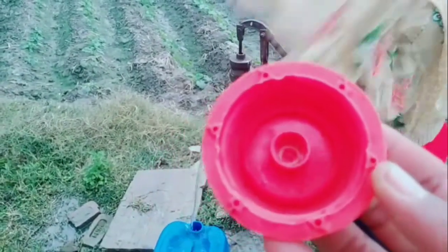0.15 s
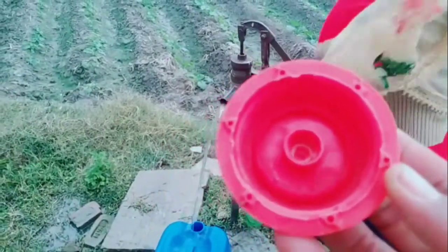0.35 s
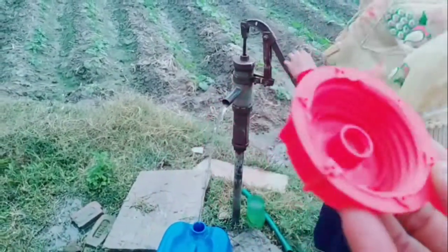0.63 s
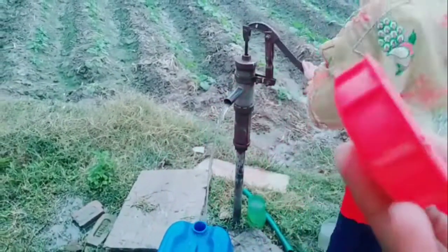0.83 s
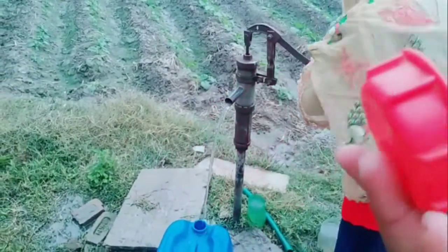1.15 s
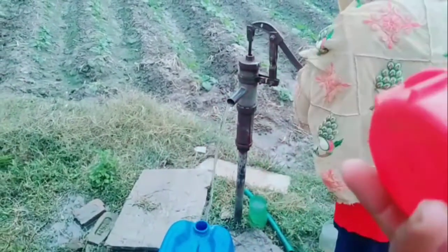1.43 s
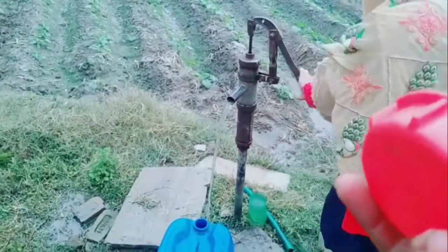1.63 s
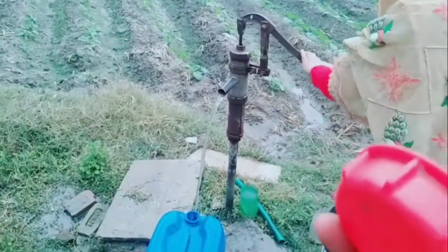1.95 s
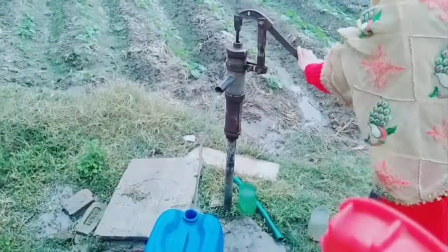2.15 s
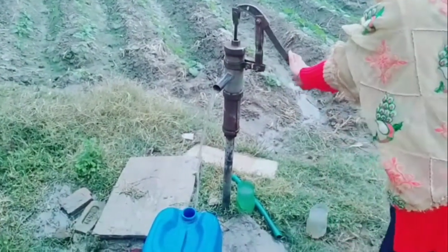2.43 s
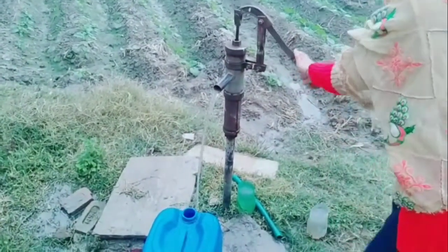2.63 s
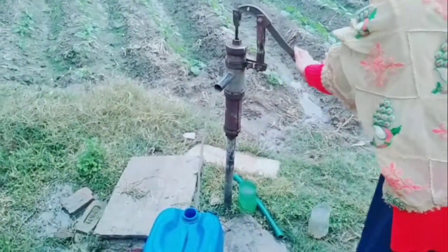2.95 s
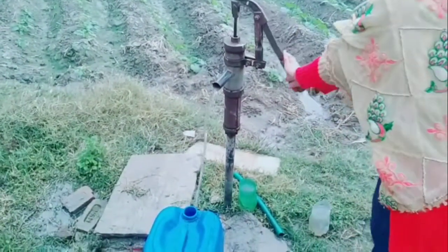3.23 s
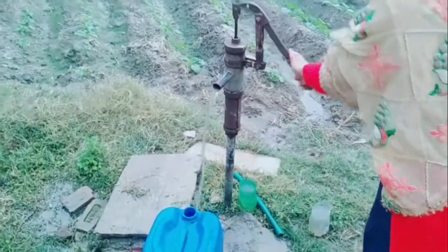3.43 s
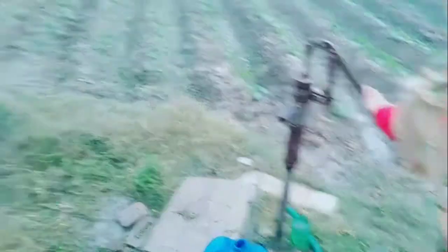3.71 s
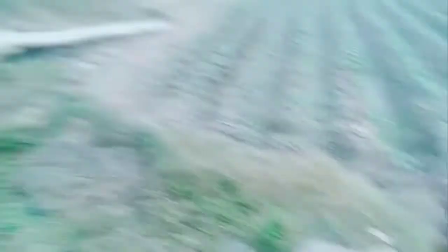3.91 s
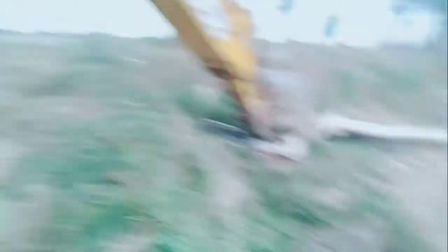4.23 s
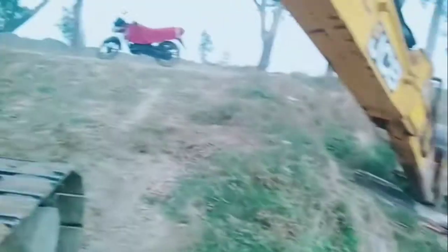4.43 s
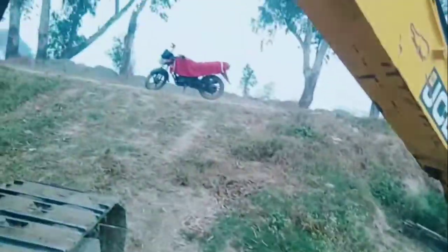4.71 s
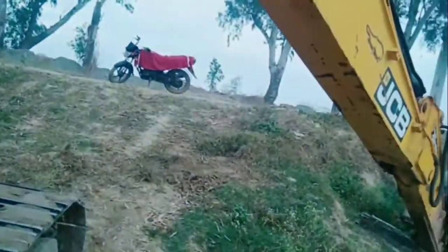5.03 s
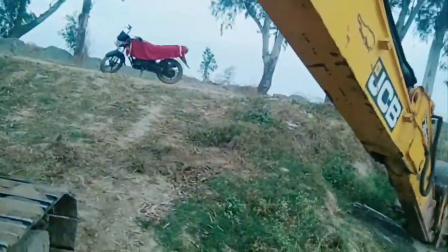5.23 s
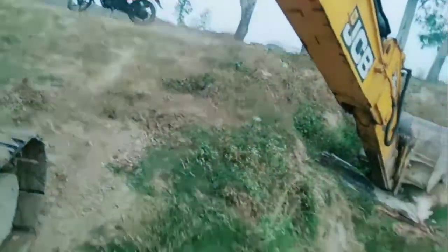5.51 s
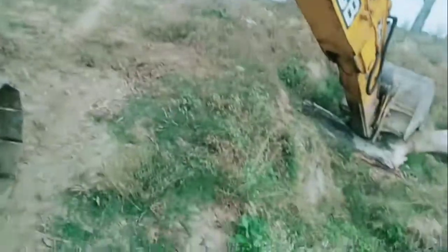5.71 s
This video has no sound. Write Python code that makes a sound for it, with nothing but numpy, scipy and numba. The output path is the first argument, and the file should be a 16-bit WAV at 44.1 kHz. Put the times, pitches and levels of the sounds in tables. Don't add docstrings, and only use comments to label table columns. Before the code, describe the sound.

Close to an open field, water falls from a hand pump in irregular gulps. A busy burst of sharp spatters comes first, then thinner patter with separate slaps, a hollow plastic throb just after two seconds, and sparser splashes to the end. Iron linkage clinks lightly and squeaks once. A phone a few steps away hears it dry and bright, with faint wind rumble and gated, darkened quiet moments.

```python
import sys
import numpy as np
from scipy import signal
from scipy.fft import rfft, irfft, next_fast_len
from scipy.io import wavfile
from scipy.ndimage import uniform_filter1d
from numba import njit

SR = 44100
rng = np.random.default_rng(int(sys.argv[2]) if len(sys.argv) > 2 else 0)


def store_wav(level_fs):
    pcm = np.round(np.clip(np.atleast_2d(level_fs), -1, 1) * 32767)
    wavfile.write(sys.argv[1], SR, pcm.T.astype(np.int16))


def field_ratio(decibels):
    return 10 ** (np.asarray(decibels, dtype=float) / 20)


N = 258867
TIME = np.arange(N) / SR


def unit(x):
    return x / np.sqrt(np.mean(x ** 2))


def colour(x, shape, low_hz, high_hz):
    size = next_fast_len(len(x))
    f = np.maximum(np.fft.rfftfreq(size, 1 / SR), 1)
    hz, db = np.transpose(shape)
    edges = 1 / np.sqrt((1 + (low_hz / f) ** 12) * (1 + (f / high_hz) ** 12))
    gain = field_ratio(np.interp(np.log(f), np.log(hz), db)) * edges
    return unit(irfft(rfft(x, size) * gain, size)[:len(x)])


@njit
def svf(x, hz, width):
    y, b, l = np.empty(len(x)), 0., 0.
    for i in range(len(x)):
        g, k = np.tan(np.pi * hz[i] / SR), width / hz[i]
        v = (b + g * (x[i] - l)) / (1 + g * (g + k))
        b, l, y[i] = 2 * v - b, l + 2 * g * v, k * v
    return y


def band(x, hz, width):
    return unit(svf(x, hz + np.zeros(len(x)), 1. * width))


def walk(rate):
    k = int(SR / rate)
    return uniform_filter1d(np.repeat(rng.standard_normal(N // k + 1), k), k // 2)[:N]


def swell(t, rise, t60):
    return np.clip(t / rise, 0, 1) ** 2 * field_ratio(-60 * np.maximum(t - rise, 0) / t60)


@njit
def grains(start, hz, cycles, size, length):
    y = np.zeros(length)
    for k in range(len(start)):
        steps = int(3 * cycles[k] * SR / hz[k])
        for j in range(min(steps, length - start[k])):
            u = j / steps
            y[start[k] + j] += size[k] * np.exp(-5 * u) * np.sin(2 * np.pi * hz[k] * j * (1 + .06 * u) / SR)
    return y


def droplets(low_hz, high_hz, cycles, scatter_db, count):
    when, pitch, long, size = rng.random((count, 4)).T
    hz = low_hz * (high_hz / low_hz) ** pitch
    size = field_ratio(-scatter_db * np.log(1.01 - size))
    cycles = cycles * (0.38 + 3 * long ** 3)
    return unit(grains((when * N).astype(np.int64), hz, cycles, size, N))


# (frequency [Hz], width [Hz], level [dB])
BODY = [(1168.5, 20.6, 0), (1500, 31, -13), (1810, 49, -15), (2080, 54, -3), (2240, 69, -11), (2610, 24, 5),
        (2740, 120, 0.5), (3053, 63, 2)]


def modes(x):
    return unit(sum((-1) ** k * field_ratio(db) * band(x, hz, w) for k, (hz, w, db) in enumerate(BODY)))


# (frequency [Hz], density [dB per Hz])
WATER = [(410, -69), (700, -12), (1150, -41), (1480, -11.5), (1570, -14), (1670, -25), (1800, -13),
         (2110, -5.5), (2680, -12.5), (3090, -11), (7310, 1), (8300, -1), (10300, -6.5), (13300, -16),
         (14500, -18)]


def water():
    fine = droplets(2510, 12020, cycles=3.8, scatter_db=2.0, count=14000)
    fine = fine + 0.75 * rng.standard_normal(N)
    coarse = droplets(898.0, 3374, cycles=3.15, scatter_db=2.5, count=5000)
    coarse = coarse + 1.14 * rng.standard_normal(N)
    spout = band(coarse, 1304, 93)
    splatter = colour(coarse, WATER, 1023, 4360) + 0.56 * modes(coarse) + 0.24 * spout
    top = colour(rng.standard_normal(N), WATER, 10100, 18000)
    return colour(fine, WATER, 2810, 9270), unit(splatter), top


# (time [s], peak level [dB], brightest frequency [Hz], fade t60 [s])
SPITS = [(0.1605, -26.5, 6470, 0.057), (0.184, -26, 5260, 0.026), (0.2036, -30.5, 6540, 0.16),
         (0.2554, -29, 7400, 0.039), (3.8045, -16, 6100, 0.033), (0.3915, -27, 7500, 0.047),
         (0.4755, -29.5, 2740, 0.095), (0.856, -36.5, 3910, 0.036), (0.8904, -33.5, 6800, 0.072),
         (1.041, -41, 4500, 0.037), (1.0666, -30.5, 6200, 0.037), (1.5851, -40, 7800, 0.025),
         (2.5525, -37, 6040, 0.099), (2.61, -38.5, 4950, 0.036), (2.9193, -29.5, 7160, .03),
         (3.011, -33, 7500, 0.045), (3.031, -28, 6600, 0.039), (3.1314, -30.5, 5900, 0.04),
         (0.1215, -28, 4960, 0.022), (3.252, -34.5, 6900, 0.1), (3.3154, -38, 5040, 0.032),
         (3.5818, -20.5, 5530, 0.033), (3.6742, -33, 4130, 0.021), (3.757, -31.5, 8100, 0.0082),
         (3.8521, -35, 7760, 0.092), (4.4222, -31, 3720, .09), (4.7552, -37.5, 6140, 0.053),
         (5.0305, -37.5, 6240, 0.1), (5.8053, -37.5, 7200, 0.12), (2.121, -44, 6550, 0.084),
         (2.0752, -14.5, 7300, 0.024), (.415, -31.5, 7000, .08)]
# (time [s], peak level [dB], brightest frequency [Hz], fade t60 [s])
SLAPS = [(0.0822, -25.5, 5400, 0.034), (0.131, -22, 6060, 0.067), (0.3015, -33, 2470, 0.054),
         (0.3627, -30, 6300, 0.073), (0.5296, -36.5, 6140, 0.04), (0.5766, -35.5, 4160, 0.25),
         (0.637, -38, 7140, 0.046), (0.7088, -39, 2740, 0.13), (0.8012, -38, 7200, 0.21),
         (0.9761, -29.5, 7900, 0.12), (1.1098, -27, 7700, 0.058), (1.1443, -18.5, 4670, 0.052),
         (1.136, -34, 6000, 0.18), (1.8045, -40, 6300, 0.033), (1.9095, -40.5, 6640, 0.13),
         (1.958, -28.5, 6040, 0.11), (2.077, -30.5, 4000, 0.062), (2.445, -34.5, 6200, 0.16),
         (2.7873, -21.5, 7270, 0.064), (2.9739, -17.5, 8300, 0.03), (3.1057, -37.5, 6700, 0.076),
         (3.3623, -42, 7100, 0.072), (0.343, -34.5, 7800, 0.064), (3.9644, -40, 4250, 0.022),
         (4.496, -24.5, 6050, 0.056), (4.9392, -38, 7100, 0.08), (5.139, -43, 6000, 0.087),
         (5.3006, -25.5, 6070, 0.041), (5.505, -26, 6350, 0.035), (5.5295, -35, 6200, 0.25)]
# (time [s], peak level [dB], brightest frequency [Hz], fade t60 [s])
SPLOSHES = [(0.0349, -31.5, 3020, 0.074), (0.434, -36, 7850, 0.19), (0.9524, -38.5, 2440, 0.11),
            (1.2241, -32, 7460, 0.077), (1.2875, -36.5, 7700, 0.1), (1.3192, -33.5, 2240, 0.13),
            (1.386, -41, 4900, 0.11), (1.4227, -39.5, 2170, 0.33), (1.5218, -40.5, 4570, 0.13),
            (1.688, -42, 3460, 0.073), (1.742, -38, 3400, 0.034), (2.01, -38.5, 3006, 0.085),
            (2.04, -36.5, 3040, 0.32), (2.097, -30.5, 4500, 0.055), (2.269, -27, 2340, 0.097),
            (2.344, -39, 2170, 0.3), (2.3795, -39, 1500, 0.14), (2.8446, -35.5, 3500, 0.27),
            (2.958, -34, 3560, 0.052), (3.5474, -36, 5940, 0.018), (3.824, -33, 2780, 0.049),
            (4.69, -31, 6600, 0.085), (4.68, -34.5, 3100, 0.085), (3.806, -32, 2740, 0.055),
            (5.2939, -44.5, 2290, 0.12), (5.4475, -43, 3330, 0.38), (5.5006, -37, 7200, 0.017),
            (5.5466, -32, 2240, .12), (5.628, -40, 2530, 0.18), (5.8517, -38.5, 3060, .05)]


def slaps(fizz, splatter, top):
    crack_t60_s, tail_t60_s = 0.0049, 0.32
    white, ragged, out = rng.standard_normal(N), field_ratio(2.8 * walk(500)), np.zeros(N)
    for events, low_db, top_db in ((SPITS, -28, -28), (SLAPS, -13, -33), (SPLOSHES, -7, -34)):
        for s, db, hz, t60 in events:
            span = slice(int(s * SR), min(int((s + 0.11) * SR), N))
            t = TIME[span] - TIME[span.start]
            crack = field_ratio(-7.5 - 60 * t / crack_t60_s)
            tail = field_ratio(-25.5 - 60 * t / tail_t60_s)
            fade = (crack + field_ratio(-60 * t / t60) + tail) * np.minimum(t / 0.000624, 1) * ragged[span]
            spot = band(band(white[span], hz, .2 * hz), hz, .5 * hz)
            burst = (fizz[span] + 0.89 * spot) * fade
            low = splatter[span] * fade ** 0.71 * np.minimum(t / 0.0029, 1)
            for part_db, part in ((0, burst), (low_db, low), (top_db, top[span] * fade)):
                out[span] += field_ratio(db + part_db) * part / np.abs(part).max()
    return out


# (time [s], peak level [dB])
SPARKS = [(.0865, -47), (.1225, -46), (.1855, -48), (.2555, -45), (1.2885, -48), (1.324, -55), (2.131, -50),
          (2.318, -57), (2.4775, -58), (2.788, -45), (2.9245, -51), (2.999, -55), (3.0355, -49),
          (3.259, -58), (3.274, -61), (3.5818, -55), (3.7705, -50), (3.8055, -43), (4.927, -59),
          (5.59, -56)]


def sparks(top):
    t60_s, out = .025, np.zeros(N)
    for s, db in SPARKS:
        span = slice(int(s * SR), int((s + t60_s) * SR))
        out[span] += field_ratio(db - 60 * (TIME[span] - s) / t60_s) * top[span]
    return out


# (time [s], flow level [dB], weight of the drops [dB], share of the biggest drops [dB],
# fineness of the mist [dB])
STREAM = [(0, -42.5, -4.5, 1, 1), (.41, -46, -4, -11.5, 2), (.8, -55, -0.5, 1.5, 4), (1.4, -48, -5, 2, 1.5),
          (1.56, -52.5, -27, 6, 1.5), (1.88, -54, -1, -16, -9), (2.2, -47.5, -12, 4, 1.5),
          (2.55, -52.5, -11, -6, 3), (2.86, -54, 3.5, -1.5, -1.5), (3.17, -54.5, -13.5, -3, -1.5),
          (3.5, -53, 0, -7.5, -8), (4.3, -56.5, -7.5, 1.5, 2), (4.62, -54.5, -4.5, -1.5, -1.5),
          (4.88, -60, -8, -1, 7), (5.125, -63, -7, 1, -3), (5.16, -57, -2.5, -3, -5),
          (5.66, -54, -9, -2, 1.5), (5.87, -61, 4.5, -9, -4)]


def spray(fizz, splatter, top):
    s, flow_db, weight_db, deep_db, fine_db = np.transpose(STREAM)
    biggest = signal.butter(4, 1740, fs=SR, output="sos")
    deep = signal.sosfiltfilt(biggest, splatter)
    splatter = splatter + (field_ratio(np.interp(TIME, s, deep_db)) - 1) * deep
    shower_db, shower_t60_s = -29.5, 0.4
    when, db = np.concatenate([SPITS, SLAPS, SPLOSHES]).T[:2]
    thrown = np.bincount((when * SR).astype(int), field_ratio(2 * (db + shower_db)), N)
    shower = signal.lfilter([1], [1, -field_ratio(-120 / shower_t60_s / SR)], thrown)
    shower = uniform_filter1d(shower, size=800, origin=399)
    flow = 10 * np.log10(field_ratio(2 * np.interp(TIME, s, flow_db)) + shower)
    weight = flow + np.interp(TIME, s, weight_db)
    mist = -66.5 + 1.36 * (flow + 52) + np.interp(TIME, s, fine_db)
    flutter = 1.5 * walk(35)
    layers = (flow, fizz), (weight, splatter), (mist, top)
    return sum(field_ratio(db + flutter + 1.3 * walk(25) - 5.0) * part for db, part in layers)


# (time [s], peak level [dB], frequency [Hz])
TICKS = [(.0494, -32, 5340), (.0875, -30, 9000), (.1083, -36, 7750), (.1229, -30, 2330), (.1229, -30, 8000),
         (.1771, -30, 6630), (.1859, -32, 2500), (.1859, -31, 8500), (.278, -34, 7580), (.2939, -41, 2410),
         (.3828, -34, 3620), (.4044, -40, 1810), (.4599, -42, 1980), (.4675, -36, 7670), (.5905, -46, 1550),
         (.7075, -41, 4560), (.7484, -45, 2070), (1.004, -38, 3100), (1.0518, -41, 8100),
         (1.1356, -40, 2240), (1.211, -39, 7150), (1.343, -43, 1550), (1.3964, -43, 2070),
         (1.4849, -42, 4480), (1.744, -42, 2150), (1.803, -48, 2150), (2.0758, -15, 7400),
         (2.0798, -37, 1380), (2.0923, -38, 1460), (2.1211, -34, 6370), (2.353, -38, 2150),
         (2.4391, -38, 6200), (2.4606, -38, 5170), (2.5544, -33, 6110), (2.5627, -37, 6720),
         (3.1144, -38, 4220), (3.588, -40, 1980), (3.798, -34, 6980), (4.5012, -39, 1290),
         (5.4918, -41, 6800), (5.5898, -38, 6720)]


def ticks():
    cycles, out = 22, np.zeros(N)
    for s, db, hz in TICKS:
        span = slice(int(s * SR) + 1, int((s + cycles / hz) * SR))
        cycle = (TIME[span] - s) * hz
        fade = field_ratio(db + 4 - 60 * cycle / cycles) * np.minimum(cycle / 1.5, 1)
        out[span] += fade * np.sin(2 * np.pi * cycle)
    return out


# (time [s], rise [s], air mode level [dB], air mode frequency [Hz], t60 [s])
DRUM = [(.02, 0.029, -69, 245, 0.28), (.14, 0.019, -68, 148, 0.62), (.33, 0.046, -65.5, 140, 0.45),
        (0.712, 0.028, -57, 232.6, 2.1), (0.799, 0.03, -58.5, 239.3, 0.61), (1.139, 0.01, -51, 265.3, 0.6),
        (1.199, 0.045, -60, 254.5, 0.25), (2.068, 0.014, -52, 287, 0.15), (2.095, 0.012, -52, 290.3, 0.14),
        (2.155, .012, -64, 280, .1), (1.29, .02, -67, 270, .2), (2.41, 0.016, -66, 230, 0.24),
        (2.771, 0.031, -66.5, 262.5, 0.43), (2.959, 0.032, -49.5, 266.6, 0.19),
        (3.809, 0.014, -51, 257.7, 0.16), (4.67, 0.03, -68, 315, 0.1), (5.495, 0.023, -59, 222.4, 0.27),
        (5.53, 0.019, -54, 270.4, 0.19)]
# (time [s], rise [s], air mode level [dB], air mode frequency [Hz], t60 [s])
THROBS = [
    (2.268, 0.016, -37, 246, 0.09),
    (2.306, 0.02, -42, 258, 0.09),
    (2.343, .015, -48, 250, .1),
    (2.376, .014, -51, 240, .12),
]


def can_air():
    longest_s, out = 0.28, np.zeros(N)
    noise, knock = rng.standard_normal((2, N))
    thud = band(band(knock, 340, 420), 420, 600)
    for events, rough in ((DRUM, .8), (THROBS, .2)):
        for s, rise, db, hz, t60 in events:
            span = slice(int(s * SR), int((s + longest_s) * SR))
            t = TIME[span] - s
            boom = band(band(band(noise[span], hz, 95), hz, 130), hz, 160)
            air = (1.3 - rough) * np.sin(2 * np.pi * hz * t) + rough * (boom + field_ratio(-26) * thud[span])
            out[span] += field_ratio(db) * air * swell(t, rise, t60) * np.clip((longest_s - t) / 0.093, 0, 1)
    return out


# (start [s], end [s], frequency [Hz], level [dB])
HUMS = [(0.617, 0.753, 593, -67), (0.874, 1.027, 581, -68.5), (1.136, 1.208, 605, -70),
        (2.266, 2.315, 595, -61), (2.335, 2.4, 680, -67), (2.35, 2.39, 510, -69), (2.39, 2.44, 600, -72),
        (2.967, 3.018, 910, -52.5), (4.68, 4.756, 884.6, -68.5), (1.15, 1.22, 817, -64.5),
        (5.49, 5.55, 1170, -66), (5.63, 5.683, 603, -66), (5.708, 5.766, 590, -71.5),
        (5.545, 5.61, 600, -79), (5.552, 5.628, 924, -69), (5.64, 5.695, 1170, -62),
        (0.705, 0.822, 2760, -59), (.9, 1.03, 2760, -63), (1.122, 1.2, 850, -66), (2.925, 3.06, 1070, -68),
        (3.89, 4.4, 1326, -72), (5.637, 5.697, 1470, -61), (5.717, 5.767, 1510, -58),
        (5.78, 5.83, 1520, -59), (5.825, 5.91, 1398, -60), (5.837, 5.91, 1520, -66),
        (1.881, 2.21, 1047, -68), (3.22, 3.309, 1020, -76), (3.336, 3.46, 1025, -80),
        (3.329, 3.543, 1325, -72), (3.545, 3.62, 1340, -63), (3.548, 3.658, 1010, -69),
        (3.59, 3.809, 1330, -71), (3.81, 3.87, 923, -60), (4.203, 4.408, 1816, -73),
        (4.47, 4.554, 1375, -59.5), (5.2, 5.237, 1390, -69.5), (2.803, 2.905, 1250, -63),
        (4.91, 4.96, 1302, -62), (5.12, 5.26, 1928, -72), (0.958, 1.012, 2250, -60),
        (5.636, 5.795, 2833, -63.5), (5.842, 5.91, 3120, -63)]
# (start [s], end [s], frequency [Hz], level [dB])
MORE_HUMS = [(.67, 1.023, 1150, -64.5), (.52, 0.796, 1515, -69), (0.88, 1.004, 1500, -66),
             (.84, 1.04, 2220, -66), (1.16, 1.38, 1150, -67), (0.803, .82, 2500, -55),
             (2.26, 2.426, 1148, -64), (2.32, 2.371, 1506, -64), (2.075, 2.13, 430, -68),
             (3.81, 3.85, 400, -68), (2.96, 3.02, 420, -68), (.33, .4, 680, -74), (.42, .47, 780, -72),
             (2.38, 2.422, 1520, -59), (2.429, 2.475, 1534, -56)]


def hums():
    noise, out = rng.standard_normal(N), np.zeros(N)
    slosh = walk(30)
    throb = field_ratio(3.5 * slosh)
    bend = 1 + .02 * uniform_filter1d(slosh[::-1], size=2500)
    for events in (HUMS, MORE_HUMS):
        for start, end, hz, db in events:
            span = slice(int(start * SR), min(int(end * SR), N))
            t = TIME[span]
            shape = np.minimum(1, np.minimum((t - start) / 0.01, (end - t) / 0.039).clip(0))
            tone = band(band(noise[span], hz * bend[span], 27.4), hz, 140)
            out[span] += field_ratio(db) * shape * throb[span] * tone
    return out


# (time [s], frequency [Hz], level [dB])
SQUEAK = [
    (4.54, 6000, -84),
    (4.55, 5930, -59),
    (4.575, 4970, -56),
    (4.59, 4960, -62),
    (4.608, 6280, -54),
    (4.63, 6440, -55),
    (4.65, 6500, -66),
]


def squeak():
    s, hz, db = np.transpose(SQUEAK)
    level = field_ratio(np.interp(TIME, s, db, -120, -120))
    return level * band(rng.standard_normal(N), np.interp(TIME, s, hz), 160)


# (time [s], frequency
# [Hz], level [dB], t60 [s])
RINGS = [(.034, 1370, -33, 0.045), (1.143, 2080, -42, 0.3), (2.138, 850, -49, 0.052),
         (2.167, 2250, -37.5, 0.033), (2.172, 860, -48, 0.046), (2.79, 3100, -42, 0.092),
         (2.272, 2330, -24, 0.028), (2.271, 1500, -35.5, 0.077), (2.976, 3630, -34.5, 0.076),
         (4.423, 3680, -42, 0.053), (5.035, 3020, -53, 0.6), (5.05, 8800, -46, 0.072),
         (5.347, 2144, -49, 0.1), (5.345, 1270, -50, 0.1), (5.55, 5900, -55, .08),
         (0.302, 2400, -31, 0.023), (.4765, 2830, -33, 0.025), (.1225, 4480, -25, 0.0057),
         (.162, 7100, -18, 0.004), (3.8057, 6370, -13.5, .005), (3.582, 6200, -17, 0.0048),
         (2.0757, 7400, -15, .008), (2.0755, 3970, -20.5, 0.011), (0.187, 5300, -37, 0.0056),
         (.258, 7140, -15.5, 0.0054), (0.3927, 7350, -11.5, 0.005), (1.9495, 8250, -26, 0.05),
         (1.9595, 8190, -19, 0.022), (2.922, 8400, -36, 0.0034), (2.925, 6200, -41, 0.0057),
         (3.253, 6500, -34, 0.0081), (3.77, 8500, -31, .006), (4.355, 2100, -50, .04),
         (4.21, 1850, -50, .03), (0.00352, 2000, -27, 0.0099), (0.13, 2600, -26.5, 0.014),
         (0.26, 8500, -28, 0.0044), (0.26, 7000, -28, .005), (.364, 2640, -31.5, 0.02),
         (0.392, 3200, -33, .008), (.3915, 4100, -29, 0.0089), (.417, 2200, -33, 0.018),
         (0.4368, 7560, -25, 0.0054), (.448, 2030, -34, 0.012), (.509, 2260, -34.5, 0.0095),
         (1.1, 2560, -43, .01), (2.04, 1950, -32, 0.0047), (2.184, 2260, -42, .03),
         (5.3003, 6300, -20, 0.0076), (1.321, 2320, -35.5, 0.037), (5.561, 1065, -44, 0.065),
         (5.559, 2250, -40, .06), (3.1505, 7100, -28, .006)]


def linkage():
    damped_s, out = .24, squeak()
    for s, hz, db, t60 in RINGS:
        span = slice(int(s * SR) + 1, int((s + t60) * SR))
        t = TIME[span] - s
        attack = np.minimum(t / (0.0505 * min(t60, .05)), 1)
        hand = np.clip((damped_s - t) / 0.052, 0, 1)
        out[span] += field_ratio(db - 60 * t / t60) * attack * np.sin(2 * np.pi * hz * t) * hand
    return out * field_ratio(1.06 * walk(60))


# (frequency [Hz], density [dB per Hz])
FIELD = [(12, -45), (20, -23.5), (70, 1), (92, -5), (150, -11.5), (293, -8), (492, -14), (602, -12),
         (761, -17.5), (1100, -19), (1430, -53), (2420, -120)]
# (time [s], level [dB], rise [s], t60 [s])
GUSTS = [(0, -65, 0.064, 1.86), (.3, -77, 0.08, 0.39), (.65, -76, 0.14, 11), (3.35, -80, .1, 3),
         (2.0, -64, 0.095, 0.71), (2.58, -80, .05, 1.5), (4.23, -68.5, 0.077, 1.5), (4.8, -79.5, 0.19, 1.5),
         (5.4, -74, 0.34, 4.98)]


def field():
    hush = colour(rng.standard_normal(N), FIELD, 190, 1100) * field_ratio(-82.5 + 1.2 * walk(3.9))
    hiss = colour(rng.standard_normal(N), [(20, 0), (20000, 0)], 11000, 14500)
    hiss = hiss * field_ratio(-83 + 1.5 * walk(4))
    gusts = field_ratio(-85) + sum(field_ratio(db) * swell(TIME - s, rise, t60) for s, db, rise, t60 in GUSTS)
    return hush + hiss + colour(rng.standard_normal(N), FIELD, 18, 169) * gusts


def scene():
    near = slaps(*water()) + spray(*water()) + ticks() + can_air() + hums() + linkage()
    top = water()[2]
    near = near + sparks(top)
    return (near + field_ratio(-16.5) * np.roll(near, int(.004 * SR)) + field())[None]


def roll_off(x):
    return signal.sosfilt(signal.butter(12, 15110, fs=SR, output="sos"), x)


# (frequency [Hz], level [dB per bin])
GATE = [(300, -112), (950, -106), (1530, -90.5), (1680, -85), (1900, -90.5), (3000, -91), (4300, -87),
        (5200, -89), (8500, -100.5)]


def record(dry):
    f, _, z = signal.stft(dry[0], SR, nperseg=1024, noverlap=768)
    waver = uniform_filter1d(rng.standard_normal(z.shape), size=5, axis=0)
    waver = unit(uniform_filter1d(waver, size=11, axis=1))
    thin = (f > 9800)[:, None]
    z = z * field_ratio(waver * np.where(thin, 3.6, 2.6) * (f > 800)[:, None])
    power = uniform_filter1d(uniform_filter1d(np.abs(z) ** 2, size=3, axis=0), size=7, axis=1)
    hz, db = np.transpose(GATE)
    threshold_db = np.interp(np.log(f + 1), np.log(hz), db)[:, None]
    limit = field_ratio(np.where(thin, -100, threshold_db)) ** 2
    floor = field_ratio(np.where(thin, -24, -16))
    gain = np.clip(1 - (limit / (power + 1e-20)) ** 2, floor, 1)
    gain = gain * field_ratio(-36 * (f > 14150))[:, None]
    clean = signal.istft(z * gain, SR, nperseg=1024, noverlap=768)[1][None, :N]
    return roll_off(clean)


dry = scene()
out = record(dry)
store_wav(out)
```